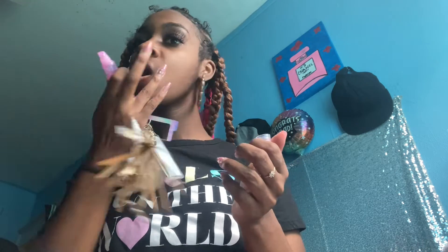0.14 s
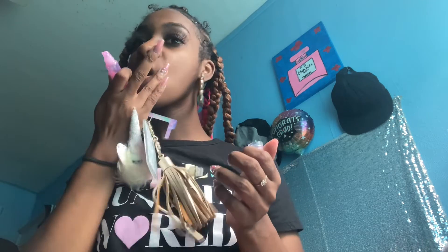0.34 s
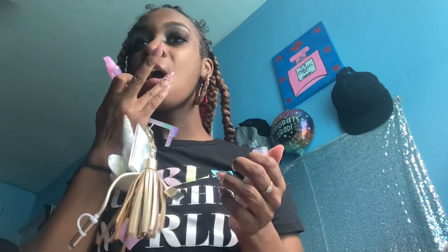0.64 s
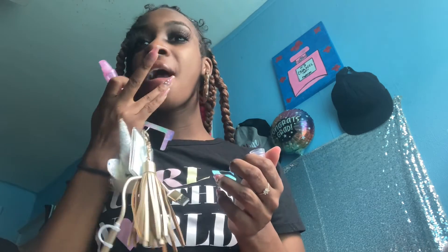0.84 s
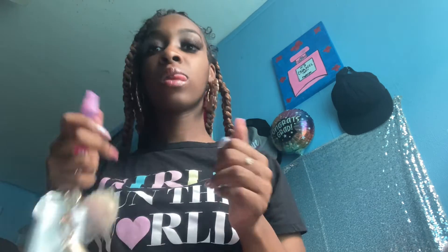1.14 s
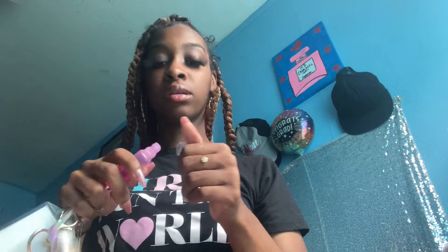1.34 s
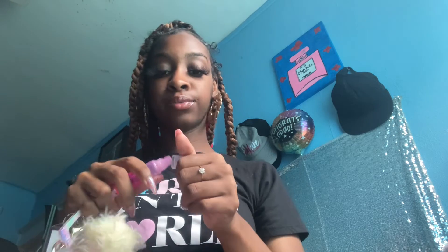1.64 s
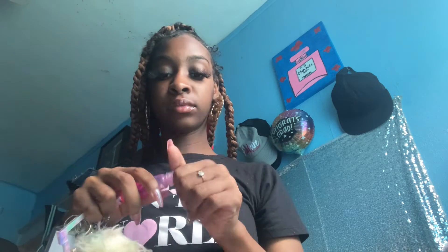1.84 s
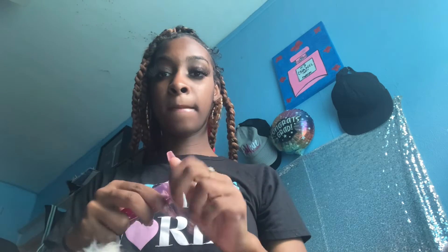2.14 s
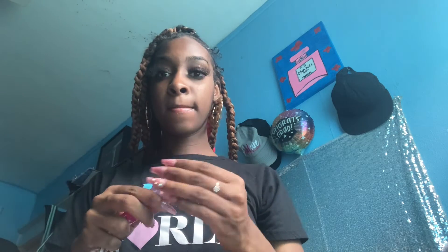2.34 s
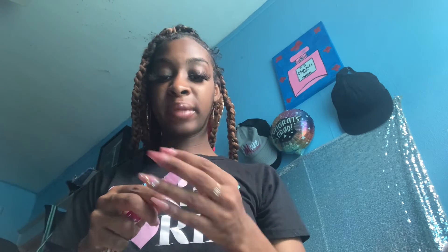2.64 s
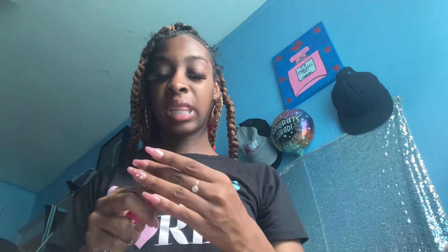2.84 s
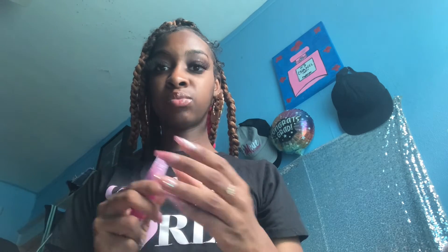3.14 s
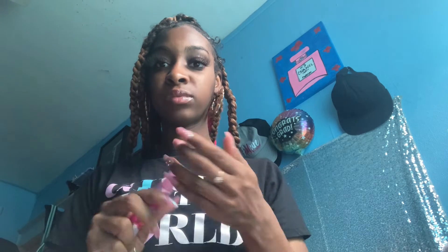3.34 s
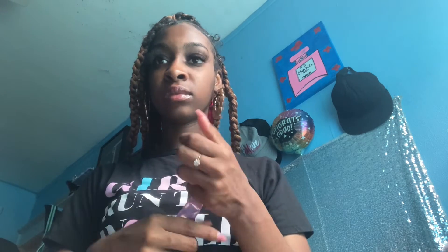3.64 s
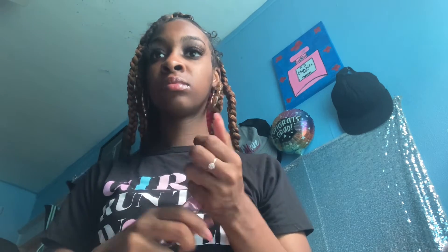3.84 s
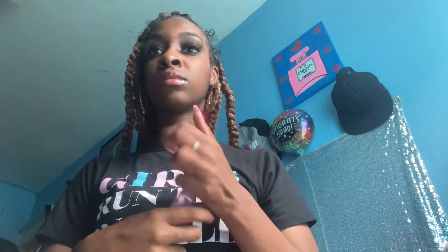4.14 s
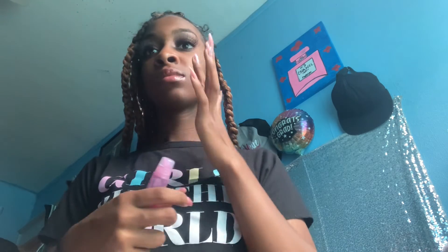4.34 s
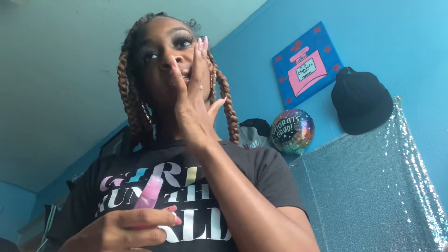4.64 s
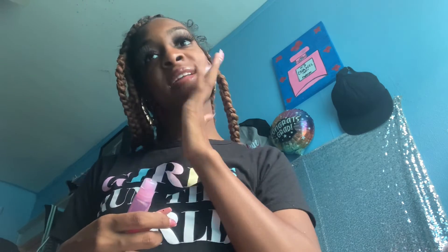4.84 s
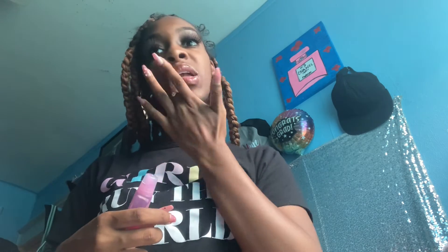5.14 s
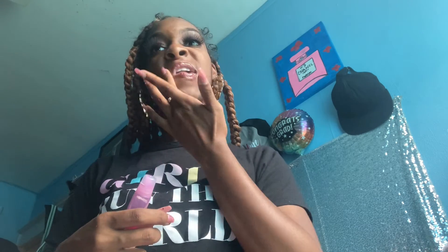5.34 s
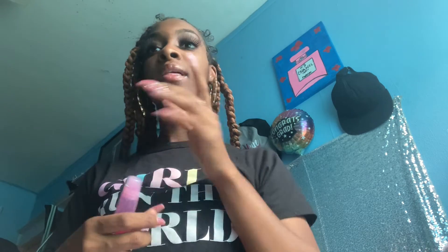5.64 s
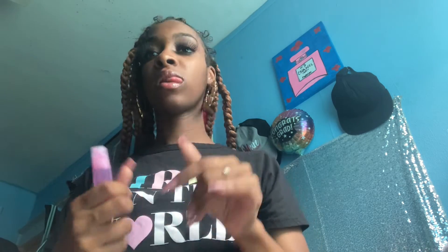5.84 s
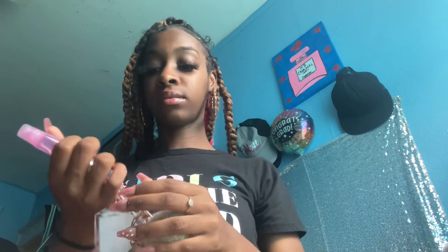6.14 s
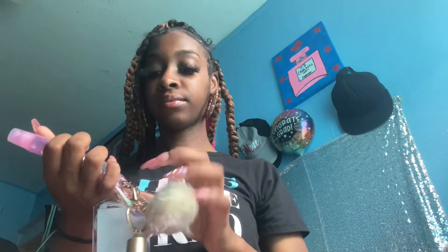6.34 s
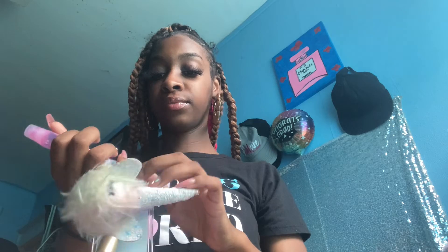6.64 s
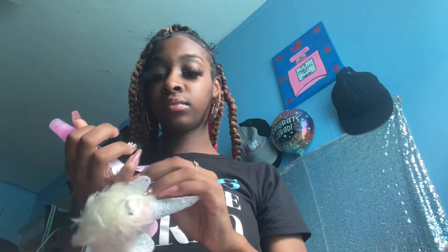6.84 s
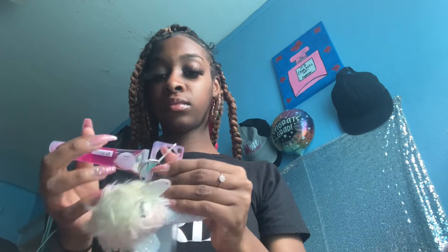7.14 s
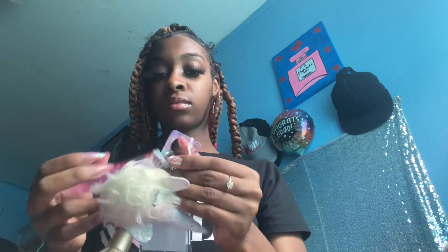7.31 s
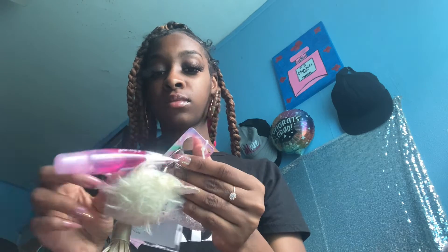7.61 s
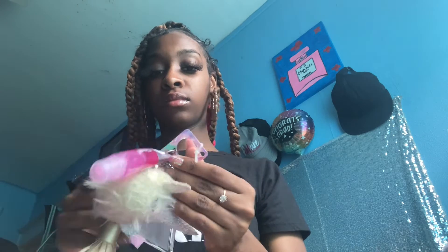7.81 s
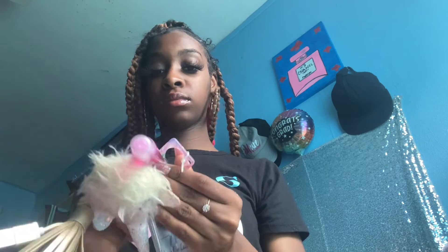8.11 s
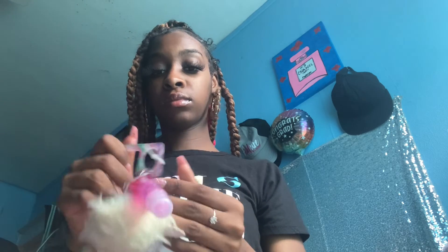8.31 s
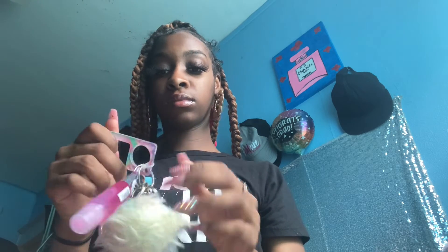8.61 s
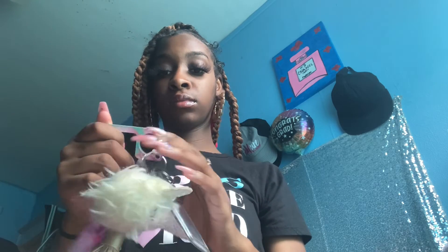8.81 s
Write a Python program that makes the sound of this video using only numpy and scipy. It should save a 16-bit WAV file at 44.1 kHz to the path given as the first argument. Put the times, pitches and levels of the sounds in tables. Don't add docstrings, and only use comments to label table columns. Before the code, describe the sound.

A quiet room with a soft low hum and slight hiss, heard by a close stereo microphone on a hard table. From 0 to 0.8 s, plastic charms and metal bits on a keyring clack in short uneven clusters, then briefly pause. Around 1.0-1.9 s the rattling is dense, with crisp ticks. From 2 to 3.3 s come more separate, higher plastic taps of a small bottle, with faint sliding fingers; a sharp one hits at 3.1. Busy clicking and hollow low knocks fill 3.4-4.3 s. Then it nearly stops: tiny ticks, soft skin thumps near 4.6, 5.05 and 5.8 s, a barely audible distant whine. At 5.9 s the bunch rattles again in steady hollow clacks until 7.2 s, eases, then bursts loudest around 7.8-8.0 s. Smaller clusters follow at 8.2-8.5 s, a short gap, and firm final clacks near 8.9 s.

```python
import sys
import numpy as np
from scipy import signal
from scipy.fft import rfft, irfft, next_fast_len
from scipy.io import wavfile
from scipy.ndimage import uniform_filter1d

SR = 44100
rng = np.random.default_rng(int(sys.argv[2]) if len(sys.argv) > 2 else 0)


def output_pcm(signal):
    pcm = np.clip(np.atleast_2d(signal).T, -1, 1) * 32767
    wavfile.write(sys.argv[1], SR, np.round(pcm).astype(np.int16))


def magnitude_from_level(level_db):
    exponent = np.asarray(level_db, float) / 20
    return 10 ** exponent


N = 395577


def evened(x):
    return x / np.sqrt(np.mean(x ** 2) + 1e-20)


def read(points, hz):
    f, value = np.transpose(points)
    return np.interp(np.log(hz + 1), np.log(f + 1), value)


def train(s, size):
    return np.bincount(np.clip((s * SR).astype(int), 0, N - 1), size, N)


def ring(x, hz, t60):
    r = np.exp(-np.log(1000) / (t60 * SR))
    w = 2 * np.pi * hz / SR
    return signal.lfilter([np.sin(w)], [1, -2 * r * np.cos(w), r * r], x)


def band(x, lo_hz, hi_hz):
    return signal.sosfilt(signal.butter(3, [lo_hz, hi_hz], "band", fs=SR, output="sos"), x)


# (frequency [Hz], level per Hz [dB])
AIR = [(25, -18), (40, -6), (58, 4), (80, -10), (210, -13), (262, -4.5), (330, -22), (450, -20.5),
       (5000, -42), (6900, -77)]
# (frequency [Hz], likeness [-1 to 1])
AIR_SAME = [(60, 0.93), (1400, 0.35), (3100, .1), (4600, .3), (5600, 0.48), (8000, 0.98)]
AIR_DB, HISS_DB = -68, -81


def air():
    frames, hz = N // 1024 + 5, np.fft.rfftfreq(2048, 1 / SR)
    a, b, c, d, patches = rng.standard_normal((frames, 1025, 5)).T
    patches = uniform_filter1d(patches, size=3, axis=0)
    patches = evened(uniform_filter1d(patches, size=6, axis=1))
    same = np.clip(read(AIR_SAME, hz), -1, 1)[:, None]
    left = a + 1j * b
    right = same * left + np.sqrt(1 - same ** 2) * (c + 1j * d)
    drift_db = 6.7 * np.linspace(-.6, .4, frames)
    house = magnitude_from_level(AIR_DB) * evened(magnitude_from_level(read(AIR, hz)[:, None] + 2.6 * patches + drift_db))
    hiss = magnitude_from_level(HISS_DB) * ((hz > 2500) & (hz < 15400))[:, None]
    z = np.array([left, right]) * np.hypot(house, hiss)
    sound = signal.istft(z, window="cosine", nperseg=2048, noverlap=1024)[1][:, :N]
    return evened(sound) * np.hypot(magnitude_from_level(AIR_DB), magnitude_from_level(HISS_DB))


def strike(s, db, modes, luck, reach=1, scatter_db=4.0):
    hz, mode_db, t60 = np.transpose(modes)
    luck = luck[:, :len(modes)]
    sign = np.sign(luck + 3)
    share = reach * magnitude_from_level(mode_db + scatter_db * np.abs(luck)) * sign
    share = share / np.linalg.norm(share, axis=1, keepdims=True) * magnitude_from_level(db)[:, None]
    return sum(ring(train(s, share[:, k]), hz[k], t60[k]) for k in range(len(modes)))


def crack(s, db, t60):
    r = np.exp(-np.log(1000) / (t60 * SR))
    clicks = train(s, magnitude_from_level(db))
    burst = signal.lfilter([1], [1, -r], clicks) * rng.standard_normal(N)
    return burst + 3 * clicks


def bottle(s, hz):
    return (hz > 1560) & (s > 1.95) & (s < 5)


def notes(s, db, hz, luck):
    t = np.arange(800) / SR
    pitch = hz[:, None]
    t60 = 0.014 * (1500 / pitch) * magnitude_from_level(2.0 * luck[:, :1])
    ratio = np.where(hz > 2000, .7, np.where(bottle(s, hz), 1.44, 1.12))[:, None]
    side_hz = pitch * ratio * (1 + .03 * luck[:, 1:2])
    side = 0.5 * magnitude_from_level(-30 * t / t60) * np.sin(2 * np.pi * side_hz * t)
    wave = np.sin(2 * np.pi * pitch * t) + side
    rise_s = np.where(hz < 1560, 0.0012, 0.0004)[:, None]
    wave = wave * magnitude_from_level(db[:, None] - 60 * t / t60) * (1 - np.exp(-t / rise_s)) ** 2
    at = np.clip((s * SR).astype(int)[:, None] + np.arange(len(t)), 0, N)
    return np.bincount(at.ravel(), wave.ravel(), N + 1)[:N]


# (frequency [Hz], level [dB], time to fade by 60 dB [s])
SHELLS = [(1020, 16, 0.016), (1440, -8.5, 0.0033), (1465, 2.5, 0.014), (1650, -0.5, 0.036),
          (1920, 11.5, 0.02), (2390, 12, 0.015), (2660, -4, 0.0036), (2850, -5, 0.019)]
# (frequency [Hz], level [dB], time to fade by 60 dB [s])
DULL = [(620, -0.9, 0.0037), (845, 1, 0.006)]
# (frequency [Hz], level [dB], time to fade by 60 dB [s])
METAL = [(8460, 2.5, 0.007), (9130, 2.5, 0.007), (9560, -2.5, 0.018), (13400, 0.5, 0.012)]


def blows(s, shell_db, hz, edge_db, metal_db):
    luck = rng.standard_normal((len(s), 4, len(SHELLS)))
    card_db = 7 * (hz < 1560)
    apart = np.log(np.array(SHELLS)[:, 0] / hz[:, None])
    partner = np.where(hz > 2000, -1, 1)[:, None] * 0.36
    paired = 0.6 * bottle(s, hz)[:, None] * np.exp(-((apart - partner) / 0.06) ** 2)
    reach = np.exp(-(apart / .055) ** 2) + paired + 0.012

    shells = strike(s, shell_db - 3.5, SHELLS, luck[:, 0], reach)
    shells += notes(s, shell_db + 3.0, hz, luck[:, 2, -2:])
    out = band(shells + crack(s, shell_db - 7 - card_db, 0.018), 950, 2765)

    snap_db = shell_db + 5.0 + 0.74 * (shell_db + 22.5)
    out += band(train(s, magnitude_from_level(snap_db)), 900, 2300)

    dull_db = np.minimum(shell_db, -30) - 21 - card_db + 2 * luck[:, 1, -1]
    out += band(strike(s, dull_db, DULL, luck[:, 1]) + crack(s, dull_db + 18.5, 0.021), 280, 800)

    edge_hz = 4600 * magnitude_from_level(1.7 * luck[:, 2, 0])
    edges = notes(s, edge_db - 2.5, edge_hz, luck[:, 2, 1:3] + 1.9)
    out += band(edges + crack(s, edge_db + 2.5, 0.014), 2000, 6600)

    tilt_db = 3 * luck[:, 3, -1]
    out += band(crack(s, metal_db - 1.5 + tilt_db, 0.015), 11000, 19000)
    metal = strike(s, metal_db - 8, METAL, luck[:, 3], scatter_db=8.5)
    return out + band(metal + crack(s, metal_db + 3.0 - tilt_db, 0.0057), 6560, 10500)


# (time [s], blow level [dB], pitch [Hz], hard edge over blow [dB], metal
# part over blow [dB])
KNOCKS = [(0.0459, -29.5, 1530, -30, -6.5), (0.0505, -34, 2125, -8.5, -5), (0.0664, -44, 1340, -19, -7.5),
          (0.1136, -35, 2320, -25, -21), (0.1252, -40.5, 2930, -1, 5), (0.1421, -50, 1280, -3, 0.5),
          (0.1578, -31.5, 1374, -7.5, -2.5), (0.2313, -44, 1190, -18, -6.5), (0.2361, -32, 1285, -19, -25),
          (0.2751, -45.5, 1568, -8.5, -19), (0.3229, -49.5, 1300, 3, 0), (0.3313, -45, 1550, -22, -29.5),
          (0.3414, -34, 1344, -39, -29), (0.3468, -39, 1400, -15, -3), (0.357, -45.5, 1370, -16, 2.5),
          (0.411, -27, 1374, -16, -12.5), (0.4219, -47, 1320, -17, -10), (0.5098, -37.5, 1350, -13.5, -14),
          (0.5727, -72.5, 1270, 9, 17.5), (0.665, -68.5, 1120, 13, 14), (0.6825, -33.5, 1350, -15, -19),
          (0.7489, -54, 3000, 10, -1), (0.7562, -56, 1400, 7, 3),
          (0.992, -41.5, 1300, -16.5, -11.5), (1.035, -52, 990, -2, 10), (1.0444, -35, 2760, -3, 5.5),
           (1.051, -43.5, 2640, 2, -0.5), (1.064, -58, 2540, 10, 13), (1.0873, -25.5, 1553, 1, -6),
           (1.113, -37.5, 1300, -2.5, -21.5), (1.125, -29.5, 1360, -3, 3), (1.14, -45, 1830, -2, 9),
           (1.1519, -33, 1777, -12, -3), (1.2257, -34, 2150, -14, 6.5), (1.2344, -32.5, 2080, -0.5, -3.5),
           (1.241, -52.5, 2640, 2, 11.5), (1.2478, -41.5, 1850, -16, -7), (1.2532, -39, 1870, -15, -25.5),
           (1.307, -39.5, 1860, -16, -10), (1.3185, -43, 1750, -21, 1), (1.3265, -40.5, 1500, -8, -4.5),
           (1.3532, -27.5, 1830, -18, -3.5), (1.3691, -36.5, 1750, -18, -32),
           (1.3772, -34.5, 1420, -16, 2.5), (1.385, -29, 1550, -18, 0), (1.405, -47.5, 1770, -7, -3.5),
           (1.4121, -38.5, 1430, -8, 12.5), (1.431, -57, 2320, -11, 18.5), (1.4642, -45, 1440, -27, -13.5),
           (1.5117, -46.5, 1400, -20, -21.5), (1.518, -44.5, 1700, -24, -30.5),
           (1.5317, -45, 1780, -5.5, -5), (1.5974, -56, 1350, -17.5, 14.5), (1.6602, -30, 1710, 3, 2),
           (1.6895, -54.5, 2400, 6, 8), (1.698, -43, 2180, -9, -1.5), (1.7942, -35, 2650, -7, -13.5),
           (1.8637, -44, 2850, -2, 5),
          (2.0037, -30.5, 2200, -5.5, -10), (2.014, -31, 1520, -18, -22), (2.082, -43.5, 2220, -8, 1.5),
            (2.1193, -40, 2020, -5.5, -4.5), (2.202, -39, 1825, -12, -4.5),
            (2.2838, -24, 1710, -6.5, -11.5), (2.3062, -50.5, 1360, 4, 9.5), (2.337, -57, 2470, 4, 8),
            (2.3732, -53.5, 1470, 3.5, 14), (2.4095, -54.5, 2410, 2.5, 9), (2.48, -58.5, 1400, -15, 7),
            (2.5217, -38, 2440, -2.5, -30), (2.5888, -58, 2240, 0, 8), (2.6109, -60, 2380, 16.5, -6.5),
            (2.6246, -45, 2400, -5, -15.5), (2.695, -61, 2390, -1, 13.5), (2.715, -41, 2390, -5, -21),
            (2.7963, -39.5, 1650, -8.5, -14), (3.0857, -31.5, 2230, -11, -37),
            (3.0994, -38, 2250, -18, -14), (3.1031, -33.5, 1680, -7, -10), (3.1343, -22, 2460, -13, -3),
            (3.1662, -64.5, 1440, 7.5, 35.5), (3.1725, -66.5, 1810, 1, 21.5), (3.2145, -60, 1720, 0, 14),
            (3.2208, -39.5, 1690, -12, -9.5), (3.2635, -57, 1910, 0, -7),
          (3.4239, -46, 1650, -3, -6), (3.4602, -36.5, 1870, -9, -17.5), (3.4663, -49, 2020, -40, 5.5),
            (3.4704, -32, 1790, -3, -21), (3.4803, -31.5, 1980, -15, -1.5), (3.5803, -34, 1750, -30, -1),
            (3.5925, -40.5, 1740, -16, -4), (3.607, -35, 2270, -32, -10), (3.615, -44, 2390, -2, -10),
            (3.6284, -37, 913, -9.5, 0.5), (3.6782, -38.5, 2220, -12, -7.5), (3.684, -38, 2300, -4, -7),
            (3.692, -44, 2390, -2, 4), (3.7221, -53, 2060, -10, 6.5), (3.799, -41.5, 2230, -1, 3),
            (3.8177, -35.5, 2340, -3, -13), (3.8232, -43, 1810, 1, 4.5), (3.8344, -43.5, 2320, -10, 0.5),
            (3.8381, -32, 2440, -28, -17), (3.8487, -38, 1726, -12, -8.5), (3.8536, -32, 950, -10, -1),
            (3.9304, -49.5, 2280, -6, 4.5), (3.9404, -41.5, 2562, -7.5, 1), (3.945, -46.5, 1760, 5, 8),
            (3.9754, -44, 2334, -9.5, -7.5), (3.984, -35, 1960, -16.5, -18),
            (4.0035, -46.5, 1722, -4.5, 1.5), (4.011, -32.5, 989, -21, -9.5),
            (4.0278, -42.5, 2290, -14.5, -8), (4.0406, -22.5, 2320, -4.5, 5), (4.061, -39, 2430, -7, 8.5),
            (4.1538, -36, 2200, -3.5, 0), (4.171, -29.5, 1774, -11, -0.5), (4.2075, -47, 1800, 1, 4.5),
            (4.2724, -36.5, 2215, -11, -6.5),
          (4.2991, -62, 1280, -9, 9.5), (4.3337, -57, 2360, 3, 1.5), (4.3698, -47.5, 1860, -25, -32),
          (4.4613, -56.5, 1490, -18, -27), (4.475, -56, 2230, -6.5, -2.5), (4.608, -67, 2270, 3, -22),
          (4.8582, -59.5, 2240, 0.5, -19.5), (5.0342, -42, 1190, -14.5, -10.5),
          (5.6403, -59, 2150, -11, 6.5), (5.6477, -53.5, 1223, -10, -1.5), (5.7987, -62, 2630, -17, 5),
          (5.9122, -53.5, 2300, 1, 11.5), (5.932, -39.5, 1600, -13, -8), (5.9395, -38.5, 1790, -8, -12),
          (6.0371, -34.5, 1840, -2, 0), (6.055, -39.5, 1420, -16, -1.5), (6.0579, -35.5, 1400, -10, -9),
          (6.1103, -34, 1920, -14, -12), (6.1319, -33.5, 1640, -14, -11.5), (6.1518, -48, 1680, -21, -17),
          (6.1736, -37.5, 1775, -33, -11), (6.2018, -40, 1710, -30, -13.5), (6.2185, -55, 1890, -25, -2),
          (6.363, -54.5, 1430, 10, 5.5), (6.369, -44, 1710, -5.5, -12), (6.3822, -27.5, 1600, 0, -7.5),
          (6.4945, -35.5, 2370, -6, 3), (6.5047, -33, 1390, -15, 1), (6.573, -39, 1480, -8, -1),
          (6.6247, -39, 1700, -6.5, 3), (6.6307, -50, 1420, -7, -7), (6.649, -39, 1490, -20, -2.5),
          (6.6638, -40, 1450, -8, 3.5), (6.713, -48, 990, -13, -2), (6.7342, -48.5, 1470, -3, 6.5),
          (6.8244, -34, 1530, -10, -10), (6.8341, -30.5, 1536, -19, -16.5), (6.8607, -48, 1480, -9, 4),
          (6.9008, -28, 1480, -25, -6), (6.9137, -38.5, 2160, -15, 2), (6.9214, -37.5, 1810, -12, -8),
          (7.0092, -45.5, 1500, -13, 4.5), (7.0354, -34, 1570, -9, -12), (7.0486, -27.5, 1270, -10.5, -8.5),
          (7.078, -29, 1440, -31, -8.5), (7.095, -33, 1330, -34, -16), (7.1346, -47.5, 1710, -22, -8.5),
          (7.1707, -31, 1340, -42, -23.5), (7.1882, -39, 1487, -25, -13), (7.3333, -50.5, 1540, -15, -8),
          (7.352, -42.5, 1559, -6.5, 6), (7.4403, -53, 1440, -1.5, -2), (7.4933, -53.5, 1850, -10, 9),
          (7.5649, -30.5, 1503, -16, -2.5), (7.7013, -45.5, 1420, -9.5, -3.5),
          (7.822, -38.5, 1490, -39, -33), (7.8341, -33.5, 1360, -31.5, -14.5), (7.8436, -39, 1780, -9, -6),
          (7.876, -26.5, 1470, -16, -3.5), (7.8853, -41.5, 1450, -23, 9), (7.9255, -41, 1620, -13, 2),
          (7.942, -17.5, 1433, -22, -9.5), (7.9525, -35.5, 1390, -13, -3), (7.9676, -26, 1504, -9.5, -4.5),
          (7.9775, -36, 1390, -12, 1), (7.9862, -23.5, 1520, -26, -11), (7.9959, -21, 1500, -26, -19.5),
          (8.0039, -39.5, 1500, -20, -15), (8.0134, -32.5, 1530, -19, 1),
          (8.1585, -33.5, 1480, -5.5, -2.5), (8.1692, -42, 1660, -19, 7.5), (8.2303, -46.5, 1410, -25, -7.5),
         (8.2572, -45, 1470, -12, -2.5), (8.291, -38, 1490, -42, -23.5), (8.3179, -48.5, 1410, -17, 4.5),
         (8.354, -39.5, 1650, -32, -3.5), (8.3846, -33, 1460, -21, -6), (8.403, -26.5, 1370, -17, -10),
         (8.4131, -26, 1460, -23, -7.5), (8.4301, -32.5, 1330, -8, 0), (8.5022, -52.5, 1345, 0, 5),
         (8.5368, -46.5, 1777, 3, 5.5), (8.715, -69.5, 2540, -4, 25), (8.7212, -73, 1420, -9, 29.5),
         (8.8685, -56, 1240, -8, 4), (8.873, -51.5, 1060, -3, 9), (8.8862, -27.5, 1378, -7.5, -5),
         (8.9504, -56, 1350, 0, -2), (8.9581, -24, 1400, -21, -6.5), (8.9632, -25, 1320, -25, -0.5)]
BLOWS = np.array(KNOCKS)


def knocks():
    luck = rng.random((len(BLOWS), 4))
    touch, bounce = BLOWS.copy(), BLOWS.copy()
    touch[:, :2] -= np.c_[.001 + .003 * luck[:, 0], 21 + 9 * luck[:, 1]]
    bounce[:, :2] += np.c_[.003 + .008 * luck[:, 2], -12 - 9 * luck[:, 3]]
    s, db, hz, edge, metal = np.vstack([BLOWS, touch, bounce]).T
    return s - .0004, db, hz, db + edge, db + metal


# (time [s], level [dB])
BUSY = [(0.0, -66), (0.3, -107), (0.7, -101.5), (1.02, -78), (1.2, -56), (1.85, -80.5), (2.15, -65),
        (3.45, -72), (3.67, -54), (4.1, -58), (4.6, -86), (5.9, -105.5), (6.02, -121), (7.02, -51.5),
        (7.52, -82.5), (8.34, -60), (8.67, -87.5), (8.97, -50)]


def unrest(s, knock_db, t60, busy_db):
    swing_in_db, swing_in_t60 = -11.5, .16
    r, r_in = np.exp(-2 * np.log(1000) / (np.array([t60, swing_in_t60]) * SR))
    power = train(BLOWS[:, 0], magnitude_from_level(2 * knock_db))
    settling = signal.lfilter([1], [1, -r], power)
    swing = signal.lfilter([1], [1, -r_in], power[::-1])[::-1]
    stirred = settling + magnitude_from_level(2 * swing_in_db) * swing
    hands_db = np.interp(s, *np.transpose(BUSY)) + busy_db
    return 10 * np.log10(stirred[(s * SR).astype(int)] + magnitude_from_level(2 * hands_db))


def chatter(per_s=400):
    luck = rng.random((4000, 4))
    s = np.cumsum(-np.log(1 - luck[:, 0]) / per_s)
    luck, s = luck[s < N / SR], s[s < N / SR]
    at, db, pitch, edge, metal = BLOWS.T
    size_db = 6.32 * np.minimum(-np.log(1 - luck[:, 1:3].T), 2.6)
    shell_db = unrest(s, db - 24.5, t60=0.13, busy_db=-9.5) + size_db[0]
    metal_db = unrest(s, db + metal - 25, t60=0.19, busy_db=-13) + size_db[1]
    spread = np.where(s > 6.45, .1, .45)
    hz = pitch[np.searchsorted(at, s) - 1] * (1 + (luck[:, 3] - .5) * spread)
    return s, shell_db, hz, (shell_db + metal_db) / 2 - 3.0, metal_db


def table(x):
    t = np.arange(300) / SR
    sparse = rng.standard_normal((4, 2, len(t))) * (rng.random((4, 2, len(t))) < .25)
    taps = sparse * magnitude_from_level(-60 * t / 0.0026)
    taps = band(taps / np.linalg.norm(taps, axis=2, keepdims=True), 1682, 6500)
    place = np.pi * 2.3 * np.arange(N) / SR
    out = 0
    for k in range(4):
        nearness = np.sin(place + k * np.pi / 4) ** 4
        out = out + signal.oaconvolve(x[None] * nearness, taps[k], axes=1)[:, :N]
    return out


# (frequency [Hz], time to fade by 60 dB [s])
ROOM = [(300, 0.31), (1500, 0.12), (15000, 0.12)]


def room(x):
    taps = np.zeros((3, SR // 2))
    at = np.arange(100, SR // 2 - 20, 20) + rng.integers(0, 20, (3, (SR // 2 - 101) // 20))
    np.put_along_axis(taps, at, rng.choice([-1., 1.], at.shape), 1)
    hz, t, z = signal.stft(taps, SR, nperseg=256)
    own = np.clip((7500 - hz) / 3000, .35, .5)[:, None]
    z = np.sqrt(1 - own ** 2) * z[2] + own * z[:2]
    fade = magnitude_from_level(-60 * t / read(ROOM, hz)[:, None])
    tail = signal.istft(z * fade, SR, nperseg=256)[1]
    return signal.fftconvolve(x[None], tail / np.linalg.norm(tail[0]), axes=1)[:, :N]


# (time [s], level [dB])
RUBS = [
    (1.87, -68),
    (2.4, -65.5),
    (3.33, -67),
    (4.3, -67.5),
    (6.749, -68.5),
]


def rubbing():
    t = np.arange(N) / SR
    swell = sum(magnitude_from_level(db) * np.exp(-((t - s) / 0.058) ** 2) for s, db in RUBS)
    grain = magnitude_from_level(8.4 * evened(uniform_filter1d(rng.standard_normal(N), size=200)))
    return swell * evened(band(grain * rng.standard_normal(N), 320, 900))


# (time [s], level [dB], pitch [Hz])
HOLLOW = [
    (3.133, -49, 830),
    (3.839, -43, 684),
    (3.855, -45.5, 800),
    (4.011, -38.5, 940),
    (4.168, -46.5, 648),
    (6.059, -45.5, 686),
    (7.938, -49.5, 908),
    (8.957, -41, 990),
]


def hollow():
    out = np.zeros(N)
    t = np.arange(3000) / SR
    for s, db, hz in HOLLOW:
        neighbour_hz = hz * rng.uniform(0.86, 0.93)
        note = np.sin(2 * np.pi * hz * t) + 1.63 * np.sin(2 * np.pi * neighbour_hz * t)
        note *= magnitude_from_level(db + 6 - 60 * t / 0.019) * (1 - np.exp(-t / 0.00056))
        part = out[round(s * SR):][:len(t)]
        part += note[:len(part)]
    return out


# (time [s], length [s], start pitch [Hz], end pitch [Hz], level [dB])
WHINES = [
    (4.47, .13, 800, 750, -76),
    (5.45, .2, 770, 745, -77),
    (7.33, .13, 775, 755, -71),
    (8.64, .06, 770, 760, -76),
]


def whine():
    t, out = np.arange(N) / SR, np.zeros(N)
    for s, length, from_hz, to_hz, db in WHINES:
        u = np.clip((t - s) / length, 0, 1)
        swell = np.sqrt(np.sin(np.pi * u).clip(0))
        turns = np.cumsum(from_hz + (to_hz - from_hz) * u) / SR
        out += magnitude_from_level(db) * swell * np.sin(2 * np.pi * turns)
    return out


# (time [s], level [dB], pitch [Hz], time to fade by 60 dB [s])
THUMPS = [
    (4.636, -44, 427.5, 0.031),
    (4.646, -47.5, 176, 0.1),
    (5.06, -53, 87, 0.5),
    (5.795, -52, 450, 0.023),
]


def thumps():
    out = np.zeros(N)
    for s, db, hz, t60 in THUMPS:
        push = train(np.array([s, s + 0.01178]), magnitude_from_level(db) * np.array([1, -.6]))
        out += ring(push, hz, t60)
    skin = crack(np.array([4.636, 5.045, 5.64]), np.array([-52, -50, -56.]), 0.15)
    return out + band(skin, 140, 1120)


def scene():
    near = blows(*np.hstack([knocks(), chatter()]))
    near = near + rubbing() + band(hollow(), 300, 870) + thumps()
    return air() + near + table(near) + magnitude_from_level(-7.5) * room(near) + whine()


def band_limit(x):
    return signal.sosfilt(signal.butter(12, 16830, fs=SR, output="sos"), x)


# (frequency [Hz], left minus right [dB])
BEAMS = [(60, -1), (240, 1), (800, 2.3), (1500, -2.5), (3770, -3), (15000, 1)]
# (frequency [Hz], phase [turns])
TWIST = [(0, 0), (4500, .04), (5300, .22), (6600, .5), (16500, 2.6)]


def record(dry):
    size = next_fast_len(N + 4096)
    hz = np.fft.rfftfreq(size, 1 / SR)
    twist = np.exp(1j * np.pi * np.interp(hz, *np.transpose(TWIST)))
    half = magnitude_from_level(read(BEAMS, hz) / 2) * twist
    reach = 1 / np.hypot(1, (hz / 15700) ** 24) / np.hypot(1, (40 / (hz + 1)) ** 4)
    beams = irfft(rfft(dry, size) * reach * np.array([half, 1 / half]), size)[:, :N]
    return band_limit(beams)


dry = scene()
out = record(dry)
output_pcm(out)
```